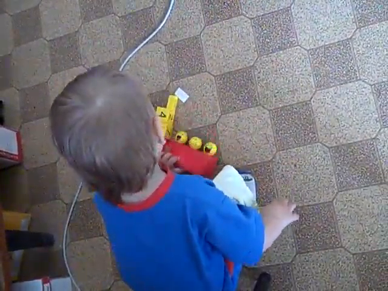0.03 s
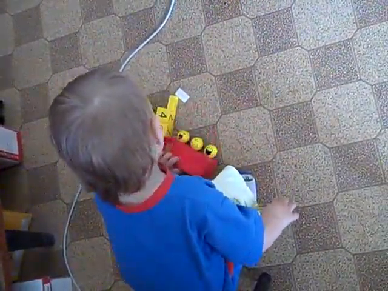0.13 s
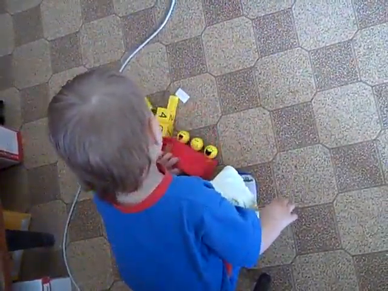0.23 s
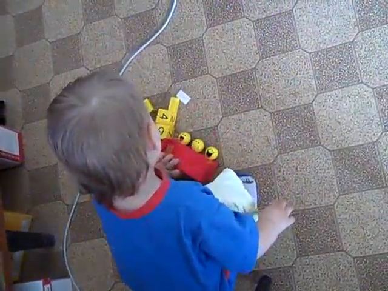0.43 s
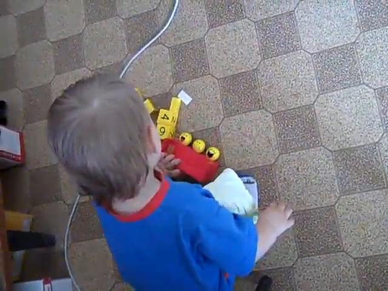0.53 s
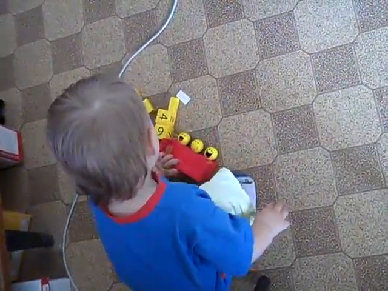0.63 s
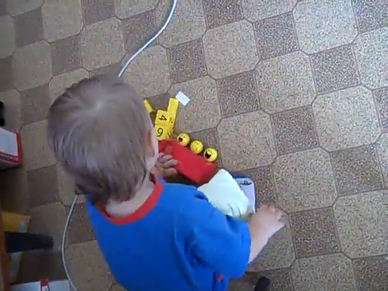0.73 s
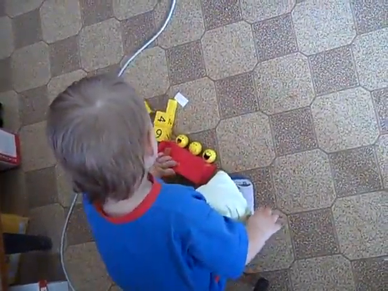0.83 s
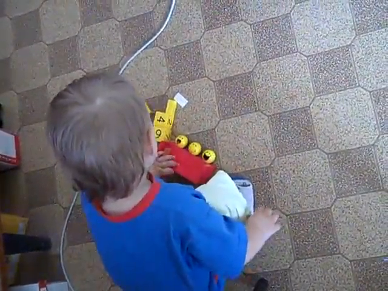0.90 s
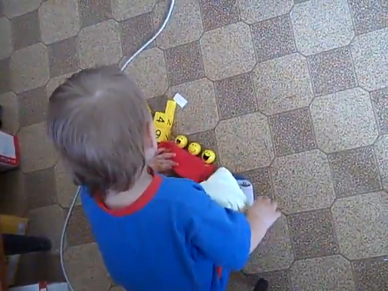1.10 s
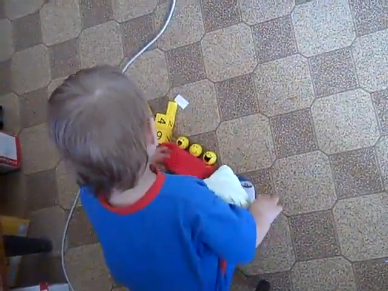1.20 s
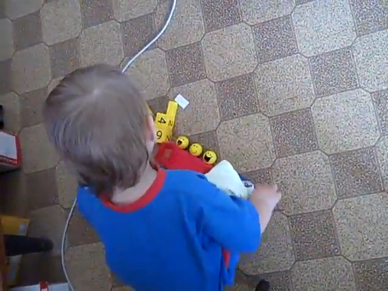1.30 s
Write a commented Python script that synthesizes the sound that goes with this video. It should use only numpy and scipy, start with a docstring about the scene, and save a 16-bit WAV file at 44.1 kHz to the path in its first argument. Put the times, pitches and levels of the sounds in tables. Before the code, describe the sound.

A hollow plastic toy knocks once on a hard floor, a sharp crack with a brief thud, close to the microphone. Faint handling ticks come before and after it, and a light tap follows in the small, quiet room.

```python
"""A small quiet room with a hard floor, where a hollow plastic toy knocks on the floor, close by. The toy ticks
faintly as it is handled, before and after the knock. On impact its shell gives a sharp crack that briefly
overloads the microphone; the floor thuds and the room rings for a third of a second. The next knock begins at
the very end, and soft room tone lies under it all."""
import sys
import numpy as np
from scipy import signal
from scipy.fft import rfft, irfft
from scipy.io import wavfile

SR = 44100
rng = np.random.default_rng(int(sys.argv[2]) if len(sys.argv) > 2 else 0)


def int16_out(signal):
    """Quantize to a 16-bit WAV file."""
    q = np.round(np.clip(np.atleast_2d(signal).T, -1, 1) * 32767)
    wavfile.write(sys.argv[1], SR, q.astype(np.int16))


N = 59535

# Room tone and microphone hiss, tone curve: freq_hz, relative_db
HUSH_COLOUR = [(15, -44.5), (25, -7.5), (63, -17.5), (96, -6.5), (126, -17), (160, -3.5), (187, -12.5),
               (257, -4), (309, -9.5), (991, -16), (1100, -13), (1330, -17.5), (1440, -19.5), (3830, -23),
               (14000, -29.5)]
# Their stereo width: freq_hz, left_right_correlation
HUSH_LIKENESS = [(60, 0.35), (180, 0.32), (540, 0.96), (1620, 0.23), (4850, 0.092), (14600, -0.38)]
# Their balance: freq_hz, left_minus_right_db
HUSH_PAN = [(60, 0.5), (180, 1), (540, 12), (1620, 4.3), (4850, 1.5), (14600, 0.81)]
# Handling ticks: start_s, level_db, centre_hz
TICKS = [(.157, -50.5, 6300), (.197, -51.5, 8430), (0.502, -53.5, 2198), (.504, -50, 490)]
# Modes of the plastic shell: pitch_hz, relative_db, t60_s, left_minus_right_db
SHELL_MODES = [(497, -14, 0.012, 0.5), (875.5, -11.5, 0.008, 0), (1032, -17.5, 0.0081, -2),
               (1657, -15, 0.013, 0), (2090, -8, 0.0082, -1), (2503, -21, 0.0069, -3.5),
               (2750, -16.5, 0.01101, 6.5), (3334, -16.5, 0.0078, 5), (4530, -18, .007, 12),
               (5390, -9, 0.0073, 1.5), (6037, 2, 0.004, 1.5), (7070, -1.5, 0.0058, 15.5),
               (7490, -13, 0.01, 17.5), (8730, -7, 0.004, 10.5)]
# Low boom of floor and room: pitch_hz, relative_db, t60_s
BOOM_MODES = [(88, -52, .4), (135, -38, .58), (166, -42, .3), (223, -29, .3), (263, -34, .3),
              (342, -32, .27), (371, -33, .23), (479, -27, .21), (543, -32, .24), (615, -32, .24),
              (770, -41, .4), (798, -29, .23), (860, -33, .22), (1044, -36, .2)]
# Higher partials that linger in the tail: pitch_hz, relative_db, t60_s
RING_MODES = [(1122, -36, .19), (1183, -36, .19), (2090, -39, .17), (2711, -41, .22), (2832, -38, .23),
              (2946, -36, .25), (3089, -41, .26), (3381, -44, .36), (5973, -36, .2), (6346, -38, .21)]
# Early echoes off furniture and walls: delay_s, left_db, right_db
ECHOES = [(.0025, -26.5, -19.5), (.0093, -25.5, -25.5), (.0118, -25, -27.5), (.0160, -20.5, -20.5),
          (.0235, -18.5, -22), (0.036, -24, -24.5)]
# Room tail, tone curve: freq_hz, relative_db
TAIL_COLOUR = [(30, -22), (60, -26), (100, -12), (150, -10), (230, -3.5), (400, -1), (540, 1), (690, -5.5),
               (950, -4), (1450, -7.5), (2100, -6.5), (2900, -2.5), (4200, -14), (6100, -8), (7500, -10.5),
               (9000, -21.5), (11000, -27), (14500, -34.5)]
# Its stereo width: freq_hz, left_right_correlation
TAIL_LIKENESS = [(60, 0.14), (300, .97), (650, .94), (1400, 0.98), (3000, 0.22), (6600, 0.65),
                 (14000, 0.45)]
# Its balance: freq_hz, left_minus_right_db
TAIL_PAN = [(100, -3), (2300, 0), (4300, -1), (6000, -7.5), (7500, 10), (10000, 12), (14500, 11)]
# Its decay time: freq_hz, t60_s
TAIL_T60 = [(40, 1.8), (150, .38), (350, 0.25), (1000, .26), (2500, 0.21), (6000, 0.3), (12000, 0.21)]

TIME_S, FREQ_HZ = np.arange(N) / SR, np.fft.rfftfreq(N, 1 / SR)


def amp(db):
    """Decibels to gain."""
    return 10 ** (np.asarray(db) / 20)


def unit_rms(x):
    """Scales a sound to rms 1."""
    return x / np.sqrt(np.mean(x ** 2) + 1e-20)


def curve(points, hz):
    """Reads a table on a log-frequency axis."""
    freqs, values = np.transpose(points)
    return np.interp(np.log(hz + 1), np.log(freqs + 1), values)


def pan(left_minus_right_db):
    """Left and right gains for a level difference."""
    return amp(np.array([[.5], [-.5]]) * left_minus_right_db)


def add(mix, start_s, sound):
    """Drops a sound into the mix at its cue."""
    part = mix[:, round(start_s * SR):][:, :sound.shape[-1]]
    part += sound[..., :part.shape[1]]


def attack(rise_s):
    """An envelope that eases up to full level."""
    return 1 - np.exp(-TIME_S / rise_s)


def decay(t60_s):
    """An envelope that falls 60 dB in t60_s."""
    return np.exp(-np.log(1000) * TIME_S / t60_s)


def mode(pitch_hz, level_db, t60_s):
    """One struck resonance: a dying sine."""
    return amp(level_db) * decay(t60_s) * np.sin(2 * np.pi * pitch_hz * TIME_S)


def band_noise(centre_hz, width_octaves):
    """Noise in one bell-shaped band."""
    bell = np.exp(-(np.log2((FREQ_HZ + 1) / centre_hz) / width_octaves) ** 2 / 2)
    return unit_rms(irfft(rfft(rng.standard_normal(N)) * bell, N))


def stereo_noise(colour, likeness, balance):
    """Noise shaped by curves for tone, width and balance."""
    left, independent = rfft(rng.standard_normal((2, N)))
    correlation = np.clip(curve(likeness, FREQ_HZ), -1, 1)
    right = correlation * left + np.sqrt(1 - correlation ** 2) * independent
    spectrum = np.array([left, right]) * amp(curve(colour, FREQ_HZ)) * pan(curve(balance, FREQ_HZ))
    return unit_rms(irfft(spectrum, N))


def room_tone(level_db=-55.5):
    """A steady bed of quiet room and microphone hiss."""
    return amp(level_db) * stereo_noise(HUSH_COLOUR, HUSH_LIKENESS, HUSH_PAN)


def handling_ticks(tail, rise_s=.0021, fade_s=.004, reverb_send=.039):
    """Loose parts of the toy touch in tiny soft clicks, each with a little room on it."""
    out = np.zeros((2, N))
    for start_s, level_db, centre_hz in TICKS:
        click = band_noise(centre_hz, width_octaves=.18) * attack(rise_s) * np.exp(-TIME_S / fade_s)
        add(out, start_s, amp(level_db) * (click + reverb_send * tail))
    return out


def room_tail(bass_hz=400):
    """Diffuse reverb: each band dies at its own speed and the bass blooms more slowly."""
    spectrum = rfft(stereo_noise(TAIL_COLOUR, TAIL_LIKENESS, TAIL_PAN))
    centres_hz = np.geomspace(60, 14000, 12)
    tail = np.zeros((2, N))
    for centre_hz, solo in zip(centres_hz, np.eye(len(centres_hz))):
        crossover = curve(np.c_[centres_hz, solo], FREQ_HZ)  # 1 at this centre, 0 at its neighbours
        band = irfft(spectrum * crossover, N)
        rise_s = .0032 + .014 / (1 + (centre_hz / bass_hz) ** 2)
        tail += band * attack(rise_s) * decay(curve(TAIL_T60, centre_hz))
    return unit_rms(tail)


def shell_crack(push_s=.00012, snap_s=.00008, snap_hz=4730, contact_s=.00028, low_cut_hz=260):
    """The push and snap of contact, then the quickly damped modes of the hollow plastic."""
    push_time = TIME_S / push_s
    push = push_time * (2 - push_time) * np.exp(-push_time)
    snap = np.exp(-(TIME_S / snap_s - 2) ** 2 / 2) * np.sin(2 * np.pi * snap_hz * TIME_S)
    body = sum(pan(side_db) * mode(hz, db, t60_s) for hz, db, t60_s, side_db in SHELL_MODES)
    crack = amp(-4.5) * push + amp(3.5) * snap + amp(3) * body * attack(contact_s)
    low_cut = signal.butter(2, low_cut_hz, "high", fs=SR)  # the shell is too small to radiate bass
    return -signal.lfilter(*low_cut, crack)


def floor_knock(crack, tail, start_s=.2325, predelay_s=.0018, tail_db=-40.5):
    """The toy hits the floor: crack, early echoes, a swelling boom, lingering partials and reverb."""
    out = np.zeros((2, N))
    add(out, start_s, crack)
    for delay_s, left_db, right_db in ECHOES:
        add(out, start_s + delay_s, crack * amp([[left_db], [right_db]]))
    boom = sum(mode(*row) for row in BOOM_MODES) * attack(rise_s=.016)
    ring = sum(mode(*row) for row in RING_MODES)
    add(out, start_s, amp(-1) * boom + amp(1) * ring)
    add(out, start_s + predelay_s, amp(tail_db) * tail)
    return out


def next_knock(crack, start_s=1.347, gain_db=-24.5, band_hz=(479, 3030)):
    """The next knock begins on the same shell, off to the right, just as the sound ends; only its first instant
    is heard, quiet and band-limited."""
    out = np.zeros((2, N))
    dulled = signal.lfilter(*signal.butter(2, band_hz, "band", fs=SR), crack)
    add(out, start_s, amp(gain_db) * pan(-9.5) * dulled)
    return out


def scene():
    """Ticks, knock and the start of the next knock over the room tone."""
    crack, tail = shell_crack(), room_tail()
    return handling_ticks(tail) + floor_knock(crack, tail) + next_knock(crack) + room_tone()


def record(dry, low_cut_hz=45, high_cut_hz=14500):
    """The crack overloads the microphone with a firm knee; then a gentle low cut and a steep high cut."""
    clipped = dry / (1 + dry ** 4) ** (1 / 4)
    thinned = signal.lfilter(*signal.butter(1, low_cut_hz, "high", fs=SR), clipped)
    high_cut = signal.firwin(255, high_cut_hz, window=("kaiser", 9), fs=SR)
    return signal.oaconvolve(thinned, high_cut[None], "same")


dry = scene()
out = record(dry)
int16_out(out)
```